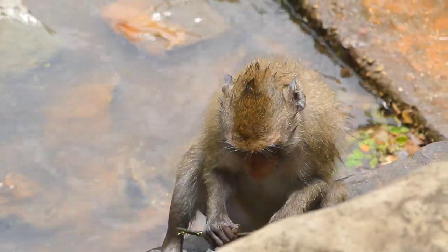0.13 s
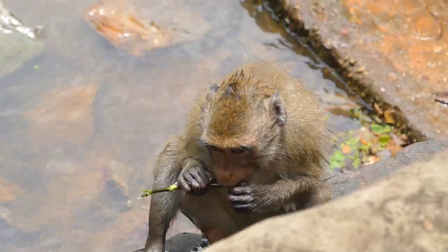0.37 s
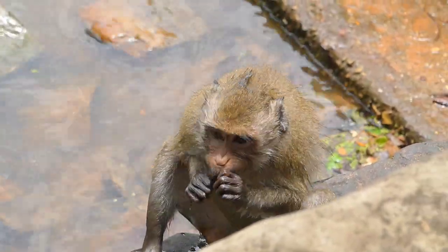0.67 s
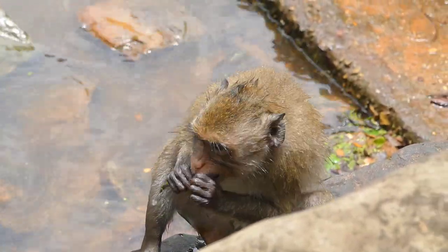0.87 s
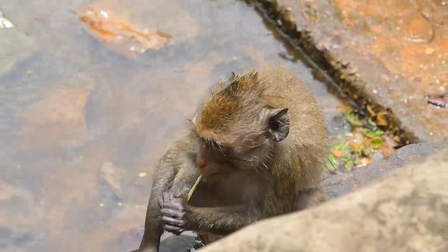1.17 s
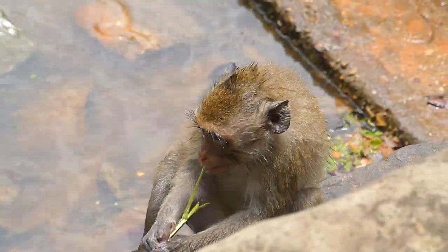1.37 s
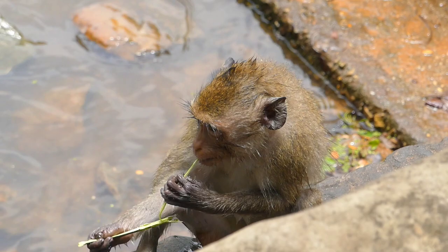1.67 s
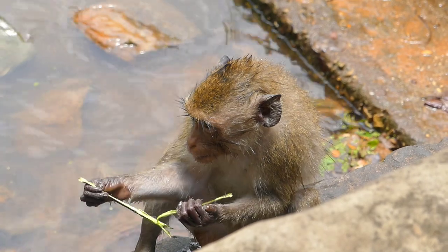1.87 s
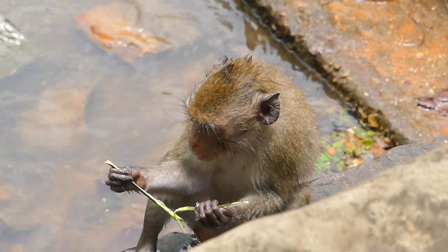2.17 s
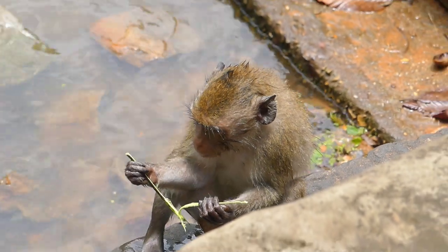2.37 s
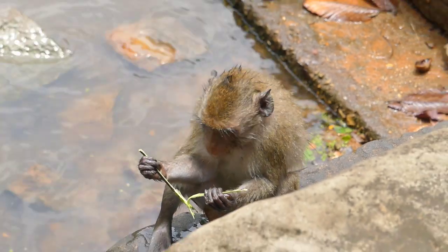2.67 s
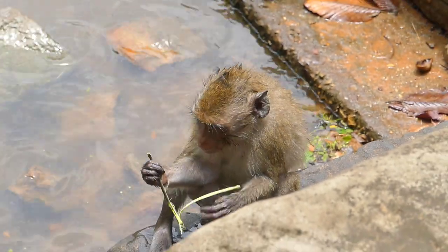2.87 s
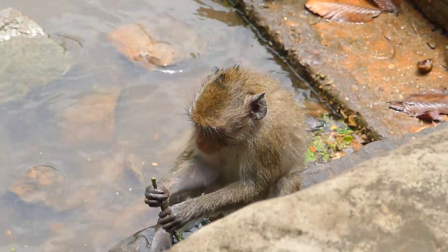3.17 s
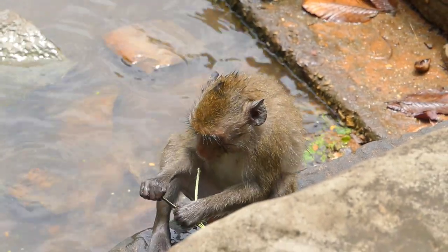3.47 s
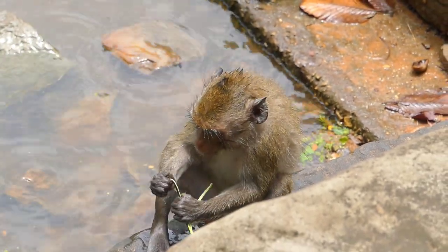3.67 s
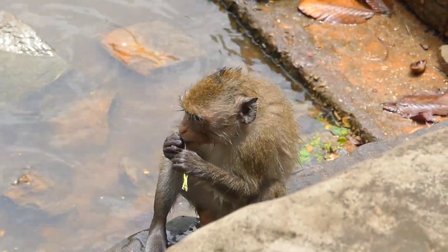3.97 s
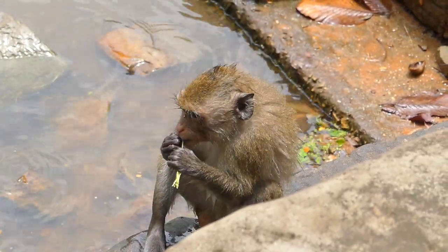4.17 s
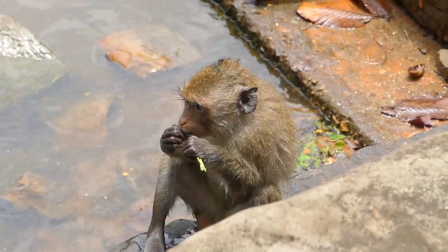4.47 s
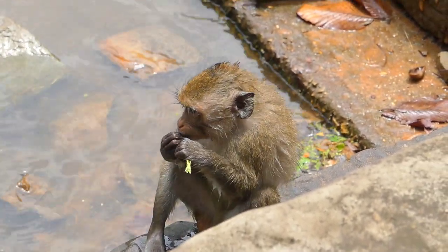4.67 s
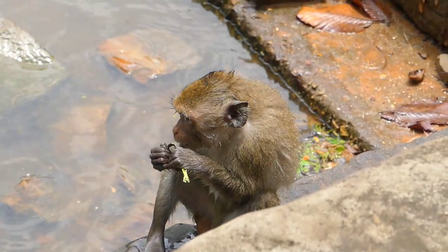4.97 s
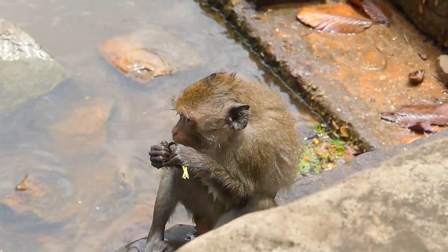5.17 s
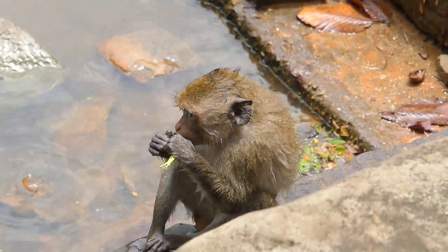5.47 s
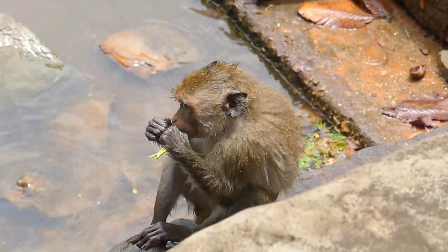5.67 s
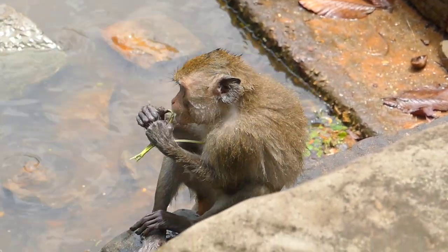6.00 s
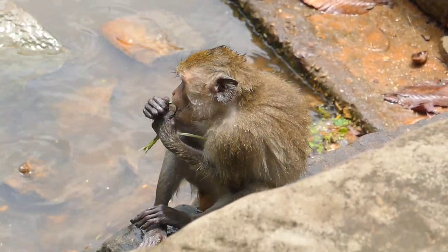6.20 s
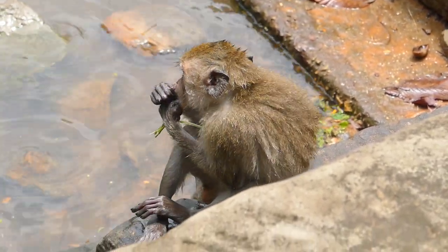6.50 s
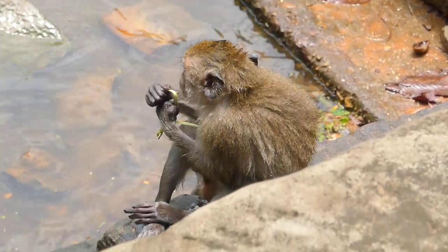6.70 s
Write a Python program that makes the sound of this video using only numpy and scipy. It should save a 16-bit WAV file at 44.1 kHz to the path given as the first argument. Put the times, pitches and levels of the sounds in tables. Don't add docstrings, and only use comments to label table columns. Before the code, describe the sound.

A constant, buzzing cicada drone dominates, easing slightly over the first few seconds. Close to the microphone, water gurgles and plops within the first second, then goes nearly silent except for tiny drips. Two very faint low frog purrs come from the right around two seconds. A bright wet splat follows later, with short echoes from rocks, then mostly insects with faint ripple and hum.

```python
import sys
import numpy as np
from scipy import signal
from scipy.fft import rfft, irfft, next_fast_len
from scipy.io import wavfile
from scipy.ndimage import uniform_filter1d, map_coordinates

SR = 44100
rng = np.random.default_rng(int(sys.argv[2]) if len(sys.argv) > 2 else 0)


def gain_from_decibels(decibels):
    exponent = np.asarray(decibels, float) / 20
    return 10 ** exponent


def unload_wav(signal):
    wavfile.write(
        sys.argv[1],
        SR,
        np.round(np.clip(np.atleast_2d(signal).T, -1, 1) * 32767).astype(np.int16),
    )


N = 301644
TIME = np.arange(N) / SR


def unit(x):
    return x / np.sqrt(np.mean(x ** 2) + 1e-20)


def along(points, hz):
    f, v = np.transpose(points)
    return np.interp(np.log(hz + 1), np.log(f + 1), v)


def wobble(rate):
    knots = rng.standard_normal(int(N * rate / SR) + 4)
    return map_coordinates(knots, [TIME * rate])


def filtered(x, response):
    m = next_fast_len(N + SR // 2)
    hz = np.fft.rfftfreq(m, 1 / SR)
    return irfft(rfft(x, m) * response(hz), m)[..., :N]


def coloured(x, spectrum):
    return unit(filtered(x, lambda hz: gain_from_decibels(along(spectrum, hz))))


def clicks(rate):
    happens = rng.random((2, N)) < rate / SR
    return rng.standard_normal((2, N)) * happens


def add(track, s, sound, pan_db):
    start = round(s * SR)
    track[:, start:start + len(sound)] += sound * gain_from_decibels([[pan_db / 2], [-pan_db / 2]])


# frequency in Hz, side minus mid in dB.
STEREO_WIDTH = [(60, -4.5), (110, -8.5), (200, 3), (380, -0.5), (690, -0.5), (1280, -11), (2360, -14.5),
                (4350, -18), (8010, -12.5), (14800, 3)]
# frequency in Hz, left minus right in dB.
STEREO_LEAN = [(60, 0.5), (110, 1.5), (200, 0.5), (380, 1), (690, 0), (1280, -1.5), (2360, -1.0),
               (4350, -0.5), (8010, -0.5), (14800, -3)]


def spread(pair, spectrum, patchy_db):
    z = signal.stft(pair, nperseg=512)[2]
    patches = uniform_filter1d(rng.standard_normal(z.shape[1:]), size=5, axis=0)
    patches = uniform_filter1d(patches, size=12, axis=1)
    pair = signal.istft(z * gain_from_decibels(patchy_db * unit(patches)), nperseg=512)[1][:, :N]
    mid, side = filtered(pair, lambda hz: gain_from_decibels(along(spectrum, hz) + [0 * hz, along(STEREO_WIDTH, hz)]))
    ears = np.array([mid + side, mid - side])
    ears = filtered(ears, lambda hz: gain_from_decibels(along(STEREO_LEAN, hz) * [[.5], [-.5]]))
    return ears / np.std(ears.mean(0))


# time in seconds, nearness in dB.
NEAREST_SINGERS = [
    (0.0, 0),
    (.9, -.5),
    (2.0, -1),
    (2.65, -2.5),
    (3.5, -3),
    (4.3, -2.5),
    (5.4, -3),
    (6.0, -2),
    (6.84, -2.3),
]


def nearness():
    s, db = np.transpose(NEAREST_SINGERS)
    return np.interp(TIME, s, db)


# frequency in Hz, level in dB per Hz.
BELLY_SPECTRUM = [(740, -57), (1250, -20), (1380, -18.5), (1670, 0.5), (1760, 3), (1840, 2), (1940, -5),
                  (2180, -10.5), (2600, -13.5), (3380, -33), (5720, -120)]
# frequency in Hz, level in dB per Hz.
RIB_SPECTRUM = [(1350, -48.5), (2300, -37), (2800, -19), (3150, -4), (3440, 3.5), (3760, -5.5), (4600, -14),
                (5980, -31), (10100, -120)]
# frequency in Hz, level in dB per Hz.
OVERTONE_SPECTRUM = [(2470, -29), (4200, -2.5), (4700, -1.5), (5330, 1.5), (6780, -5), (7450, -9.5),
                     (9680, -49), (16400, -120)]
# frequency in Hz, level in dB per Hz.
RASP_SPECTRUM = [(4560, -30), (7750, -1.5), (9840, 0), (14500, -12.5), (15100, -16)]


def cicadas():
    near_db = nearness()
    swell = wobble(5.3)
    belly_db = -40 + 0.35 * near_db + 0.45 * wobble(1.35)
    belly_db = belly_db + 0.082 * swell + 0.64 * wobble(10)
    rib_db = -30 + 0.36 * near_db + 0.14 * wobble(1.78)
    rib_db = rib_db + 0.2 * swell + 0.2 * wobble(11)
    overtone_db = -34 + 0.62 * near_db + 0.32 * swell
    rasp_db = -41.5 + 1.06 * near_db + 0.21 * swell + 0.23 * wobble(5.07)
    belly = gain_from_decibels(belly_db) * spread(clicks(30000), BELLY_SPECTRUM, patchy_db=0.5)
    ribs = gain_from_decibels(rib_db) * spread(clicks(30000), RIB_SPECTRUM, patchy_db=0.4)
    overtones = gain_from_decibels(overtone_db) * spread(clicks(30000), OVERTONE_SPECTRUM, patchy_db=0.43)
    rasp = gain_from_decibels(rasp_db) * spread(clicks(36000), RASP_SPECTRUM, patchy_db=1.1)
    return belly + ribs + overtones + rasp


def katydid():
    wing_hz, width_hz = 7687, 28
    tone = unit(filtered(clicks(6000)[0], lambda f: np.exp(-((f - wing_hz) / width_hz) ** 2)))
    level_db = -53.5 + 2.6 * nearness() + 2.2 * wobble(13)
    return gain_from_decibels(level_db) * tone * gain_from_decibels([[.3], [-.3]])


# start in seconds, peak level in dB, pitch in Hz.
BUBBLE_EVENTS = [(0.174, -28, 890), (0.178, -29.5, 563), (0.1835, -19, 975), (0.184, -24, 1216),
                 (0.196, -25, 905), (0.1966, -31, 1150), (0.212, -42, 900), (0.243, -37, 980),
                 (0.253, -35, 803), (0.2748, -33, 1210), (0.29, -44, 960), (0.3077, -38, 1190),
                 (0.358, -41, 980), (0.458, -42, 980), (0.557, -46, 277), (0.559, -43, 905),
                 (0.56, -40, 454), (0.836, -44, 891), (0.8544, -46, 1210), (0.859, -51, 670),
                 (0.864, -46, 1030), (0.937, -49, 371), (1.2984, -43, 1240), (1.7255, -42, 1250),
                 (2.589, -51, 860), (3.81, -25.5, 2530), (3.8224, -32, 2500), (4.762, -43, 980),
                 (5.521, -49, 450), (6.328, -46, 870)]


def bubbles():
    out = np.zeros((2, N + SR))
    t = TIME[:SR // 4]
    for s, db, hz in BUBBLE_EVENTS:
        t60 = 0.041 * (hz / 1e3) ** -0.62
        attack = 1 - np.exp(-t / 0.0013)
        phase = 2 * np.pi * hz * t * (1 + .012 * t / t60)
        ring = gain_from_decibels(db + 3.5 - 60 * t / t60) * attack * np.sin(phase)
        add(out, s, ring, -rng.standard_normal())
    return out[:, :N]


# start in seconds, peak level in dB, centre in Hz, length in cycles,
# left minus right in dB.
DRIP_EVENTS = [
    (0.557, -30.5, 904, 1.8, 0.5),
    (1.298, -44, 1190, 1.9, -1.5),
    (1.725, -43, 1240, 1.5, 0.5),
    (2.56, -33, 1170, 1.6, -5),
    (3.723, -35.5, 700, 3.2, -1.5),
    (3.782, -27, 1400, 2.6, -2),
    (3.789, -38, 170, 1.9, 1.0),
    (3.7927, -32, 1810, 3.4, 1),
    (3.7972, -26, 2700, 3.6, -1.0),
    (3.8614, -32, 1790, 2.2, -2.0),
]


def drips():
    slap = (3.7868, -15, 2000, 1.1, 1)
    out = np.zeros((2, N + SR))
    t = TIME[:SR // 4]
    for s, db, hz, cycles, pan_db in list(DRIP_EVENTS) + [slap]:
        thud = gain_from_decibels(db + 4 - 30 * t * hz / cycles) * np.sin(2 * np.pi * hz * t)
        add(out, s + 0.00196, thud, pan_db)
    return out[:, :N]


# peak time in seconds, low froth level in dB, high fizz level in dB, t60 in seconds.
SLOSH_EVENTS = [
    (.185, -32, -48, .09),
    (.207, -50, -40, .14),
    (.28, -45, -47, .35),
    (.34, -54.5, -54, 1.2),
    (.56, -49, -56, .13),
    (.834, -52.5, -59, 1),
    (3.784, -47, -34, 0.18),
]
# frequency in Hz, level in dB.
FROTH_SPECTRUM = [(150, -50), (300, -16), (520, -3.5), (950, 0), (1350, 3), (1900, -28), (3000, -70)]
# frequency in Hz, level in dB.
FIZZ_SPECTRUM = [(1000, -52), (1800, -8), (2500, -4), (3200, -14), (6000, -40)]


def froth():
    rise_s = .05
    low = coloured(clicks(1500)[0], FROTH_SPECTRUM)
    high = coloured(clicks(1100)[0], FIZZ_SPECTRUM)
    out = np.zeros(N)
    for s, low_db, high_db, t60 in SLOSH_EVENTS:
        shape = gain_from_decibels(-60 * np.maximum((s - TIME) / rise_s, (TIME - s) / t60))
        out += shape * (gain_from_decibels(low_db) * low + gain_from_decibels(high_db) * high)
    return out


# start in seconds, level in dB, length in seconds.
SPRAY_EVENTS = [
    (.19, -45, .06),
    (3.533, -44, .03),
    (3.78, -41, .06),
    (6.02, -50, .08),
    (6.5, -57, .06),
]
# frequency in Hz, level in dB.
SPRAY_SPECTRUM = [(1500, -28), (4000, -4), (10000, 0), (15000, 0), (15500, -60)]


def spray():
    burst = np.zeros(N)
    for s, db, length in SPRAY_EVENTS:
        quarter = length / 4
        burst += gain_from_decibels(db) * np.exp(-((TIME - s - quarter) / quarter) ** 2)
    return burst * spread(clicks(9000), SPRAY_SPECTRUM, patchy_db=3.0)


def water():
    struck = filtered(bubbles() + drips(), lambda f: (1j * f / (170 + 1j * f)) ** 2)
    return struck + froth() + spray()


# first pulse in seconds, length in seconds, level in dB, pulses a second.
FROG_CALLS = [
    (1.752, .4, -58, 25.0),
    (2.267, .24, -60, 24.5),
]
# frequency in Hz, width in Hz, level in dB.
VOCAL_SAC = [(900, 170, 0), (1070, 120, -7), (470, 90, -11)]


def sac(f):
    return sum(gain_from_decibels(db) * 1j * f * w / (c * c - f * f + 1j * f * w) for c, w, db in VOCAL_SAC)


def frog():
    out = np.zeros(N)
    for s, length, db, rate in FROG_CALLS:
        u = (TIME - s) / length
        live = (u > -.01) & (u < 1)
        beat = live * (np.diff(np.floor((TIME - s) * rate), prepend=0) == 1)
        edge_db = np.clip(2 * u - 1, -1, 1) ** 2
        pulses = beat * gain_from_decibels(0.8 * wobble(24.6) - edge_db)
        call = filtered(pulses, lambda f: sac(f) ** 2)
        out += call / np.std(call[live]) * gain_from_decibels(db)
    return out * gain_from_decibels([[-1.2], [1.2]])


# frequency in Hz, t60 in seconds.
ROCK_DECAY = [(300, 0.26), (1500, 0.14), (8000, 0.069)]


def banks(x):
    hz, t, z = signal.stft(rng.standard_normal((2, SR // 2)), SR, nperseg=256)
    decay = gain_from_decibels(-60 * t / along(ROCK_DECAY, hz)[:, None])
    tail = signal.istft(z * decay, SR, nperseg=256)[1]
    late = np.pad(x, ((0, 0), (300, 0)))
    return signal.fftconvolve(late, tail / np.linalg.norm(tail[0]), axes=1)[:, :N]


# frequency in Hz, level in dB per Hz.
RIPPLE_SPECTRUM = [(120, -36), (200, -18), (323, -7.5), (363, -4.5), (405, -7), (451, -1), (592, -6.5),
                   (717, -7.5), (860, -4), (1120, -7.5), (1350, -12.5), (1450, 2.5), (1880, -30),
                   (3190, -120)]


def stream():
    level_db = -56 + 0.66 * wobble(2.33) + 0.45 * wobble(10)
    return gain_from_decibels(level_db) * spread(clicks(9000), RIPPLE_SPECTRUM, patchy_db=1.3)


# frequency in Hz, level in dB per Hz.
HUM_SPECTRUM = [(12, -59), (20, -31), (54, -37), (77, -7), (129, 4.5), (147, 3), (210, -7.5), (260, -7.5),
                (340, -16), (570, -120)]


def air():
    nearer = np.clip((TIME - 1.8) / .6, 0, 1)
    level_db = -70 + 6 * nearer + 0.47 * wobble(2.43) + 1.1 * wobble(6)
    return gain_from_decibels(level_db) * spread(rng.standard_normal((2, N)), HUM_SPECTRUM, patchy_db=.8)


def scene():
    near = water() + frog()
    return cicadas() + katydid() + near + gain_from_decibels(-12.5) * banks(near) + stream() + air()


def top_cut(x):
    return signal.sosfilt(signal.butter(12, 15370, fs=SR, output="sos"), x)


def record(dry):
    notch_hz, width_hz, bass_hz, top_hz = 7500, 60, 70, 15170

    def microphone(f):
        notch = 1 - .8 * np.exp(-((f - notch_hz) / width_hz) ** 2)
        bass_cut = 1 + (bass_hz / (f + 1)) ** 2
        return notch / bass_cut * (f < top_hz)

    return top_cut(filtered(dry, microphone))


dry = scene()
out = record(dry)
unload_wav(out)
```